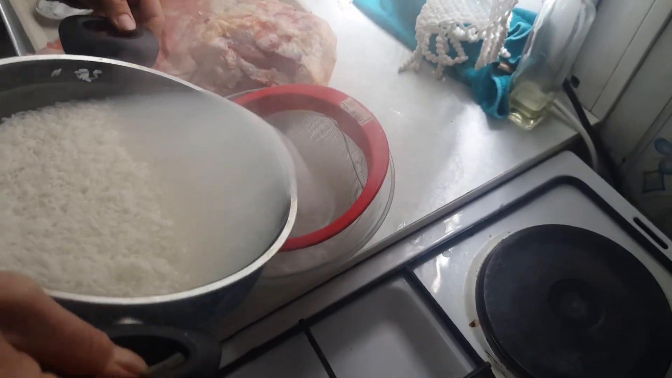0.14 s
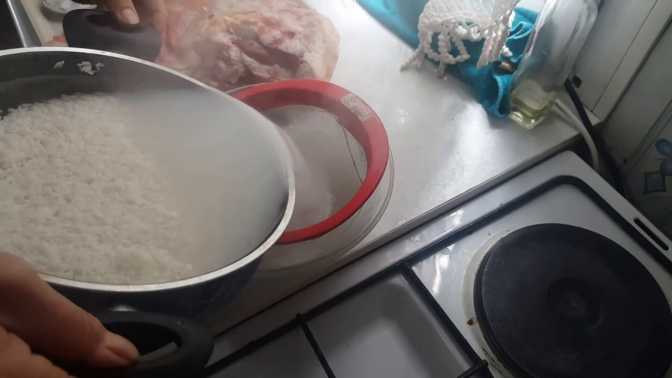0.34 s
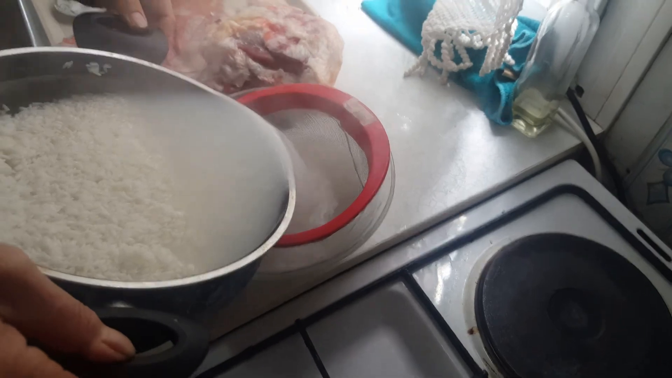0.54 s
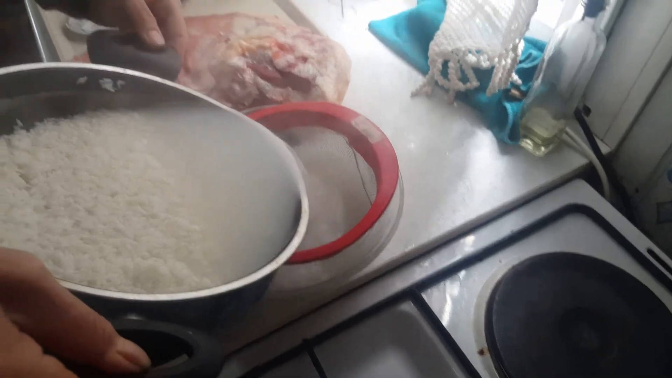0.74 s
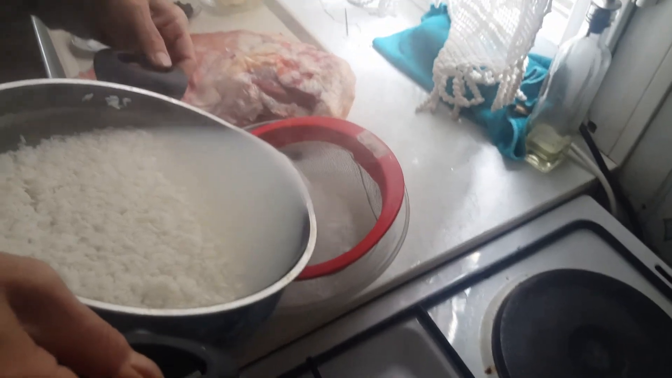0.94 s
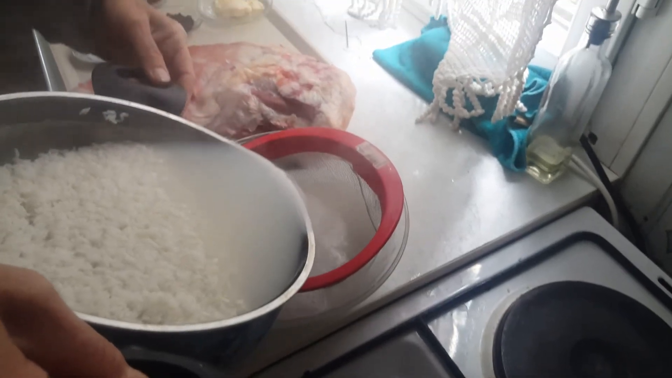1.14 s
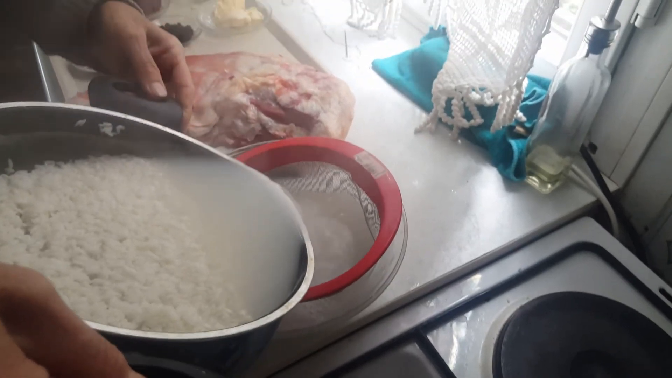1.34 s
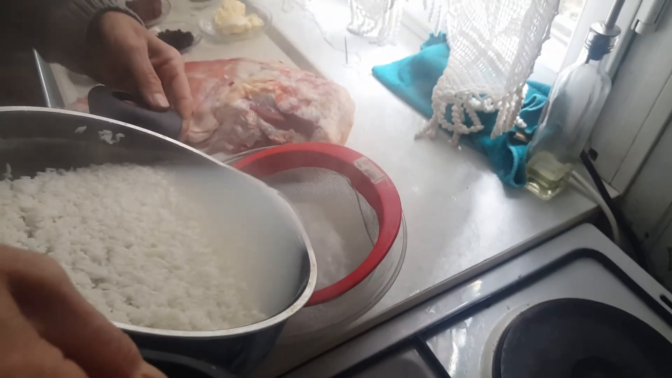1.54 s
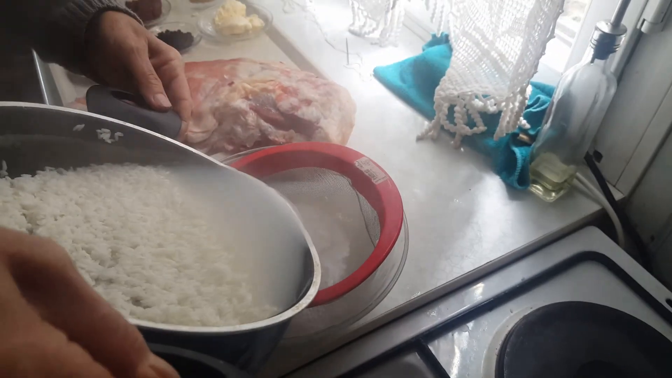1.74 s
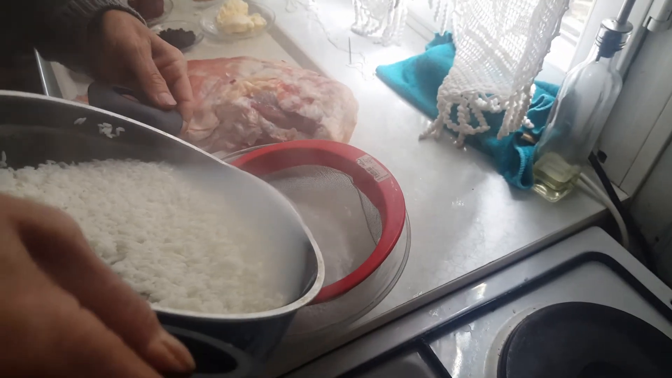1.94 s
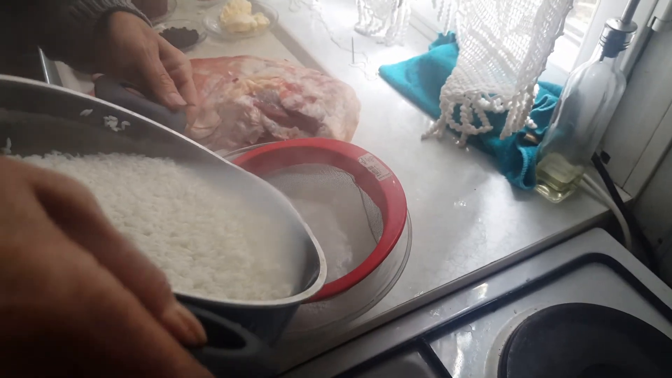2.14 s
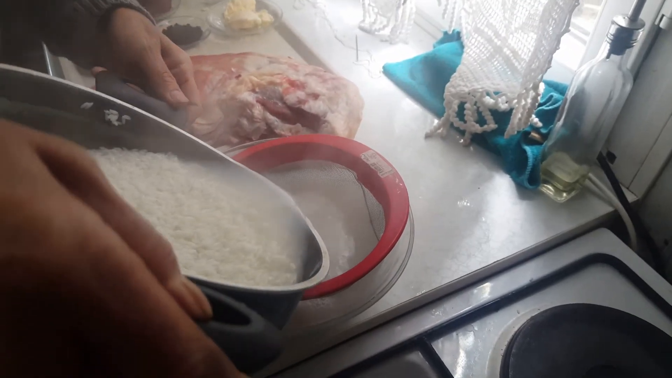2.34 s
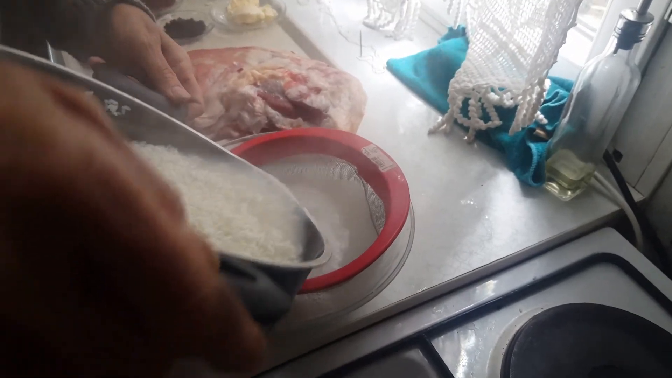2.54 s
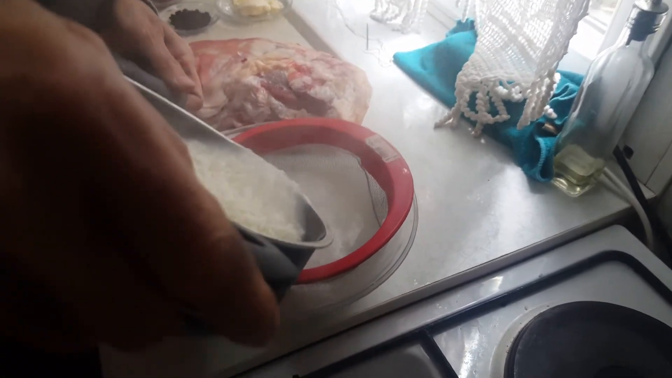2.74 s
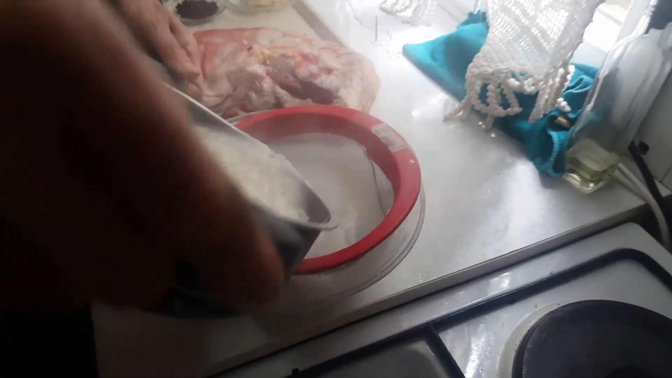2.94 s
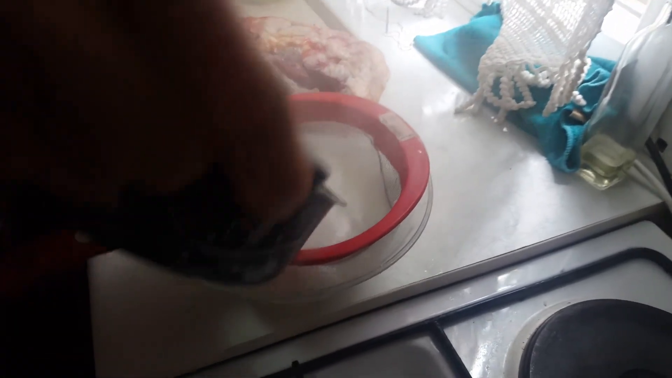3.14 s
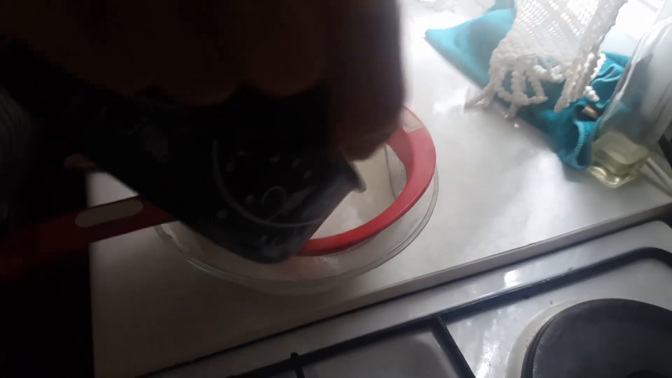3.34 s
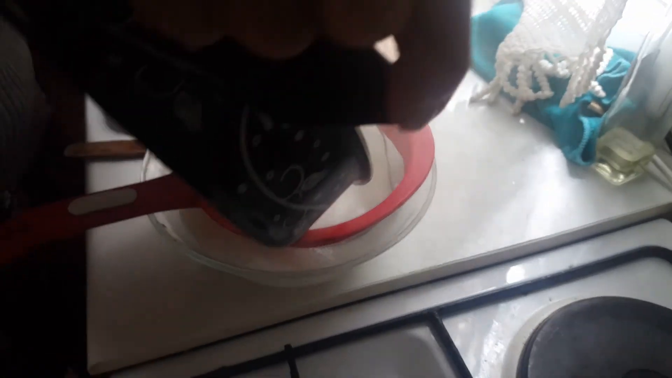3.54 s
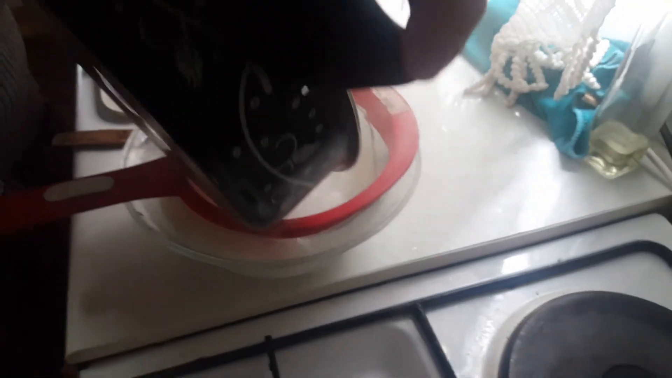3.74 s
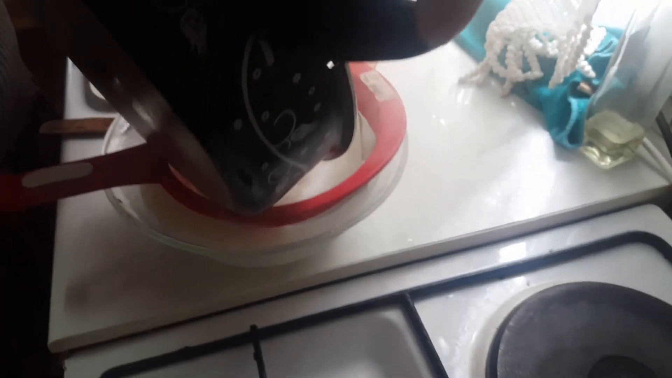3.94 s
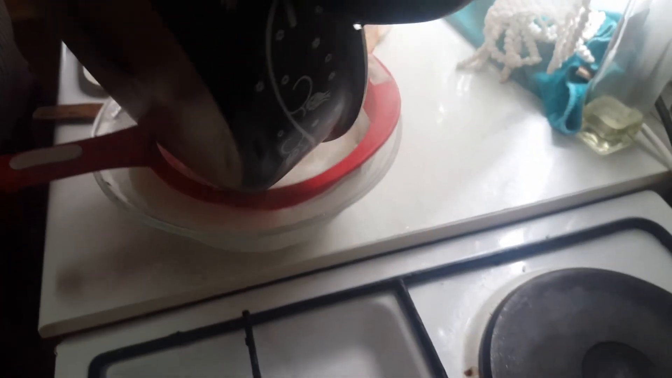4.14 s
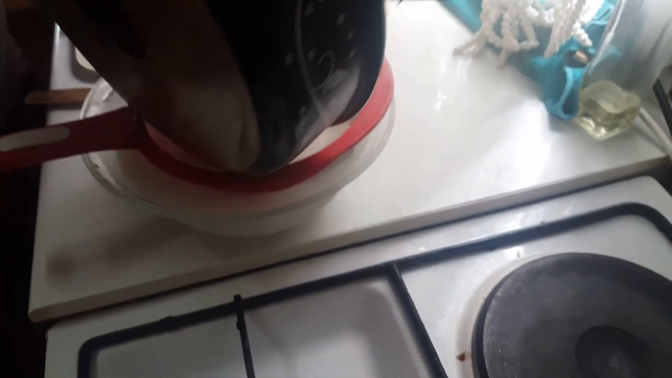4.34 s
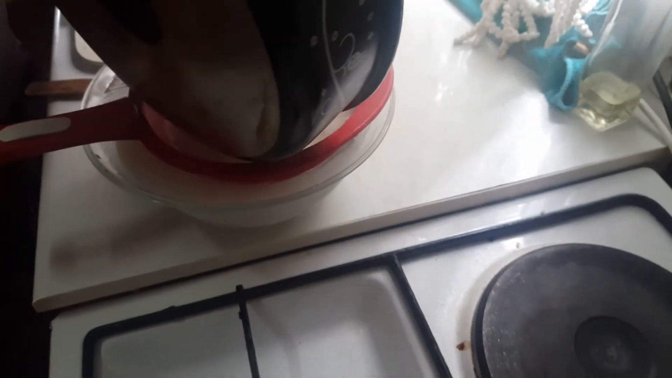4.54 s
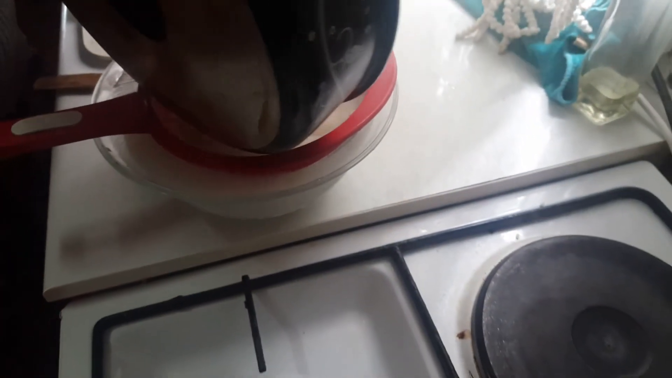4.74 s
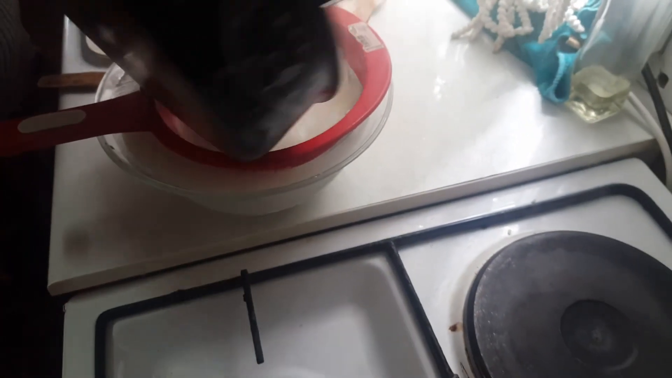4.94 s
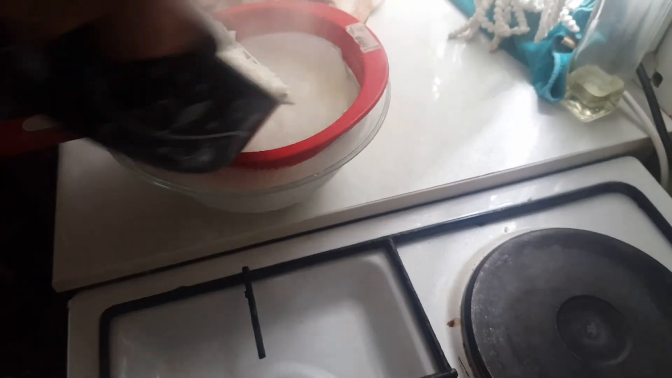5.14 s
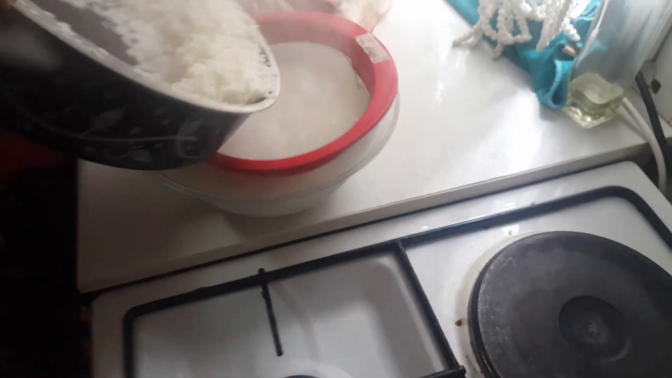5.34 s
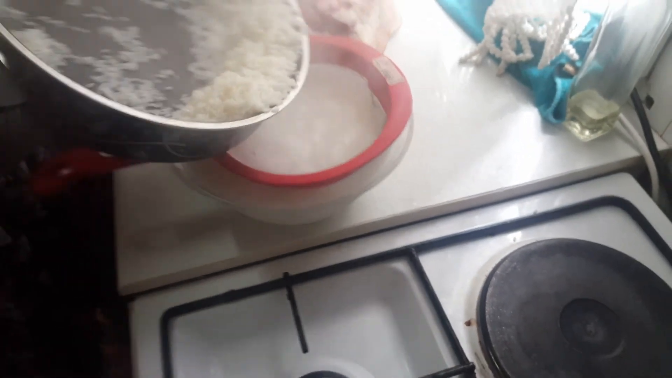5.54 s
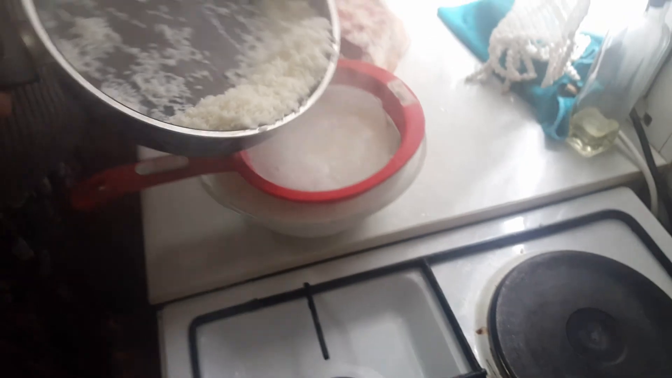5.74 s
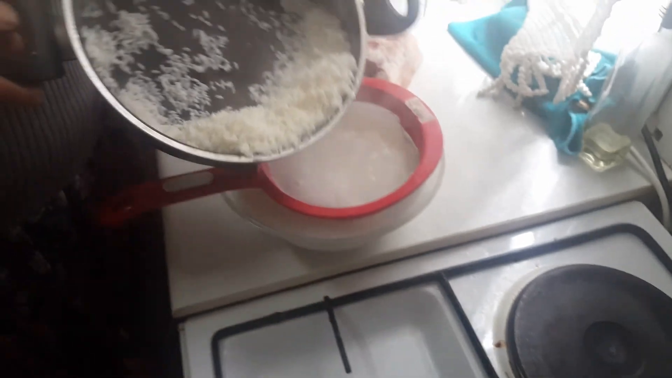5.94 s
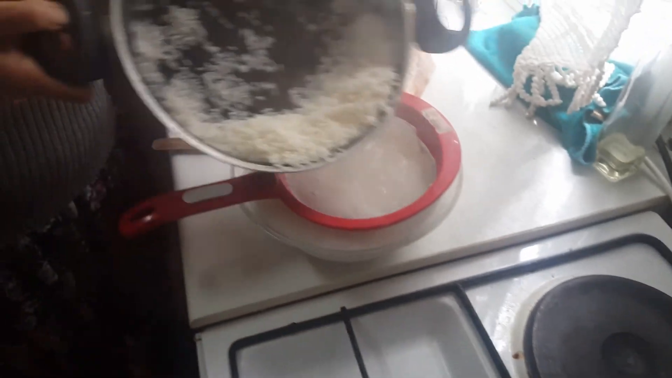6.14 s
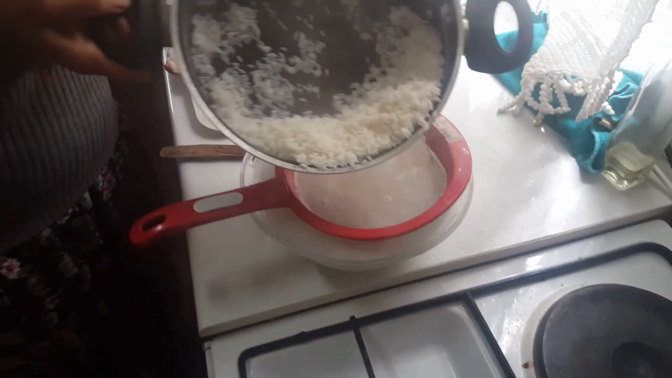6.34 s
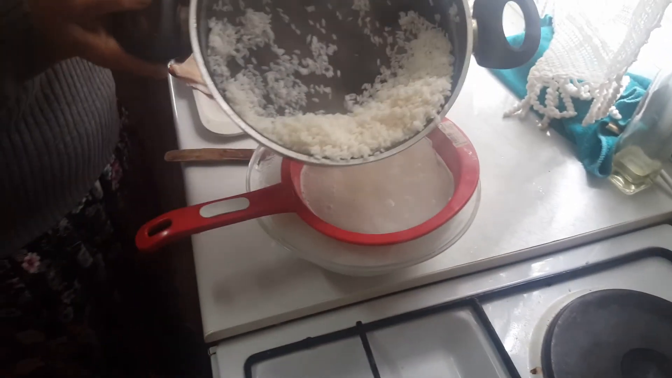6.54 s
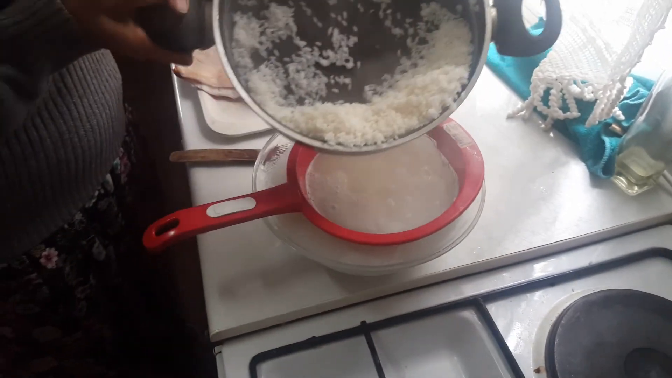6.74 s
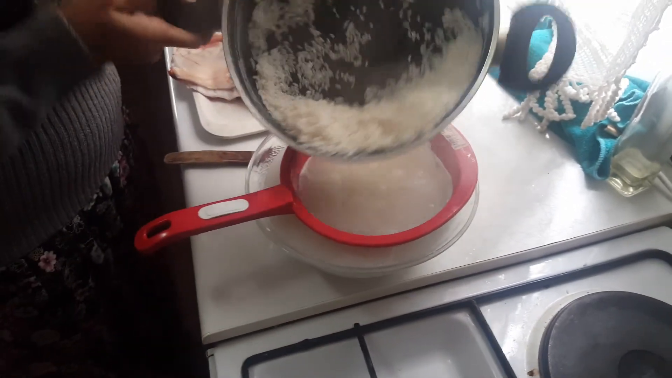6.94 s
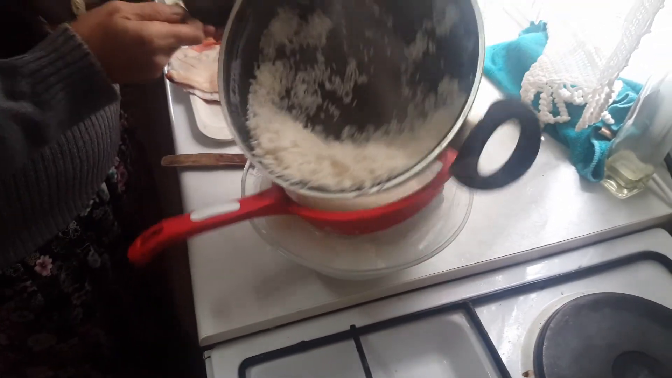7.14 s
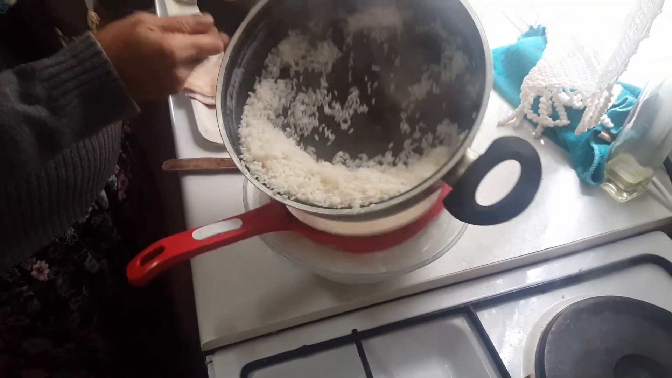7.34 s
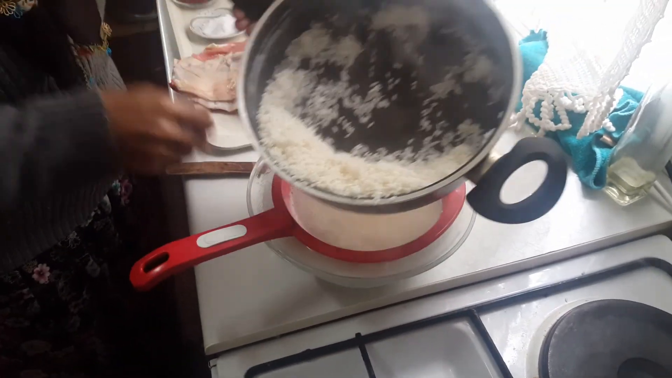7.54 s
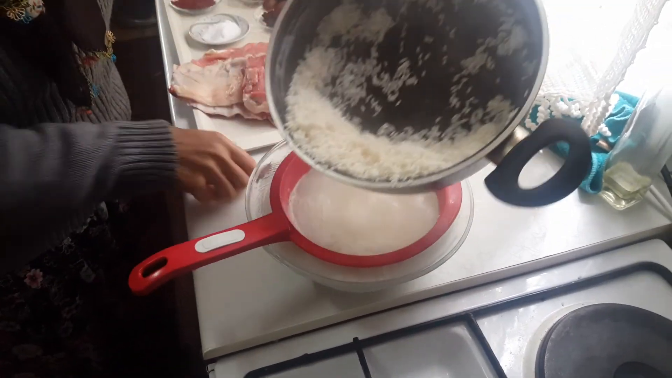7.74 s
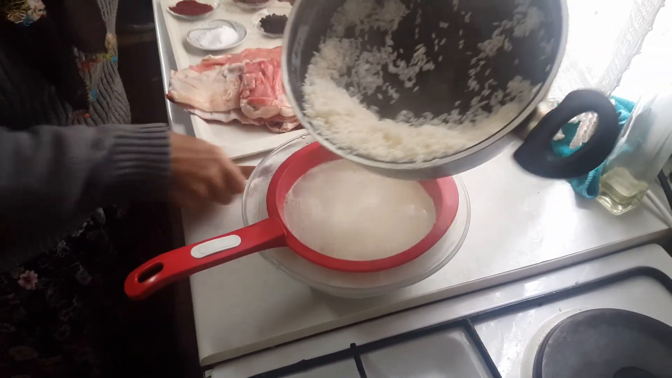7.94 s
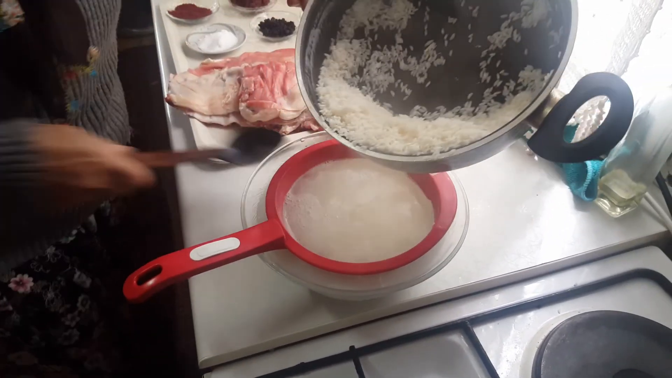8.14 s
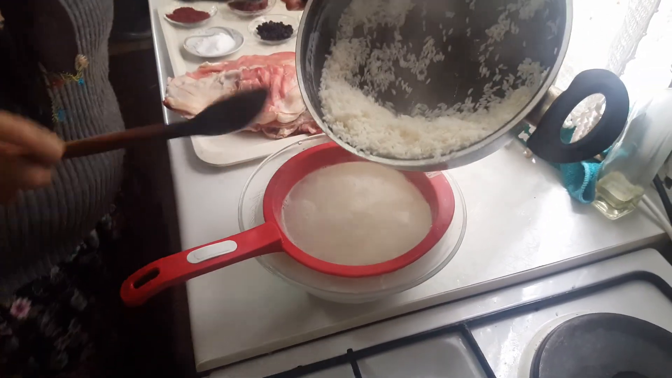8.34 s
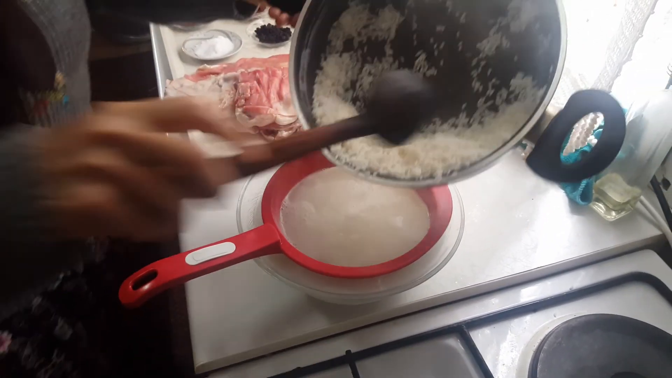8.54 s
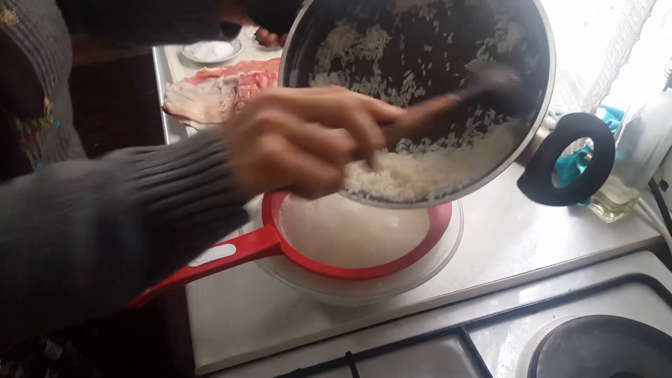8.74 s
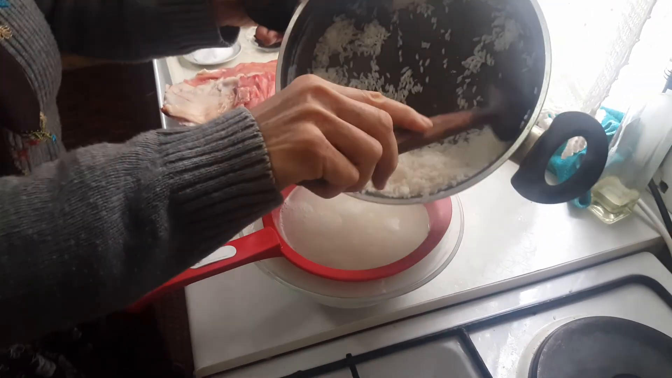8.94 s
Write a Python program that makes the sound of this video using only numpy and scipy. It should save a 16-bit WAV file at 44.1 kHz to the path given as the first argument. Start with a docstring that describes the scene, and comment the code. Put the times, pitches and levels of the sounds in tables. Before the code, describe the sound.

Water trickles and splashes from a pot through a sieve, then the pot bumps the sieve and a wooden spoon knocks once.

```python
"""Rinsing water is poured off rice from a metal pot into a sieve over a bowl, on a kitchen counter.
First a trickle: droplets patter, gouts splat, trapped bubbles ring. After a lull near 2 s the pot tips
and the stream quickens; at 4.8 s wet rice slides out with a hiss. From 5 s the pot bumps sieve and
bowl, the counter thuds and damp grains rustle. A hand nudges the sieve at 7.8 s.
Last, at 8.9 s, a wooden spoon knocks hard on the pot."""
import sys
import numpy as np
from scipy import signal
from scipy.fft import rfft, irfft
from scipy.io import wavfile
from scipy.ndimage import uniform_filter1d

SR = 44100
rng = np.random.default_rng(int(sys.argv[2]) if len(sys.argv) > 2 else 0)


def transcribe(signal):
    """Save signal, clipped to [-1, 1], as a 16-bit WAV file at the path in sys.argv[1]."""
    frames = np.atleast_2d(signal).T
    limited = np.clip(frames, -1, 1)
    pcm = np.round(limited * 32767).astype(np.int16)
    wavfile.write(sys.argv[1], SR, pcm)


N = 400428

# stereo likeness: freq_hz, correlation
COHERENCE = [(110, 0.77), (600, 0.36), (1200, 0.2), (2500, 0.089), (16000, 0.033)]
# stereo balance: freq_hz, left_minus_right_db
BALANCE = [(100, -2), (300, -9), (700, 0.5), (1500, 1), (4000, -6.5), (9000, -0.5), (14000, -5)]
# kitchen decay: freq_hz, t60_s
ROOM_DECAY = [(60, 0.33), (150, 0.67), (400, 0.55), (1400, 0.32), (3000, 0.19), (8000, 0.15), (16000, 0.11)]
# background spectrum: freq_hz, gain_db
AIR_SPECTRUM = [(20, -9), (90, 0), (400, -4), (800, -9), (1800, -14.5), (3300, -12.5), (4300, -22),
                (9000, -24), (10500, -30), (16000, -21)]
# background hums: freq_hz, width_hz, lift_db
AIR_HUMS = [(297.6, 12, 11.5), (2872, 40, 11.3)]
# rice shifting, sleeves brushing, and a brief scrape as the hand nudges the sieve at 7.8 s: start_s, hold_s,
# level_db
RUSTLES = [(5.628, 0.35, -66.5), (6.83, 0.58, -66.5), (7.817, 0.02, -70.5), (8.92, 0.01, -65.5)]
# friction spectrum: freq_hz, gain_db
RUSTLE_SPECTRUM = [(100, 3), (350, 17), (800, 4.5), (1500, 5), (2800, 7), (4500, -3.5), (8500, -2.5),
                   (10500, -7.5), (16000, -3.5)]
# hand on the sieve: start_s, body_db, scrape_db, decay_s
NUDGES = [(7.817, -40.5, -55.5, 0.016), (7.963, -49.5, -75, 0.012)]
# body and scrape bands: edge_hz
NUDGE_EDGES_HZ = [300, 1250, 7500]
# counter top modes: freq_hz, level_db, t60_s
COUNTER_MODES = [(90.1, -1.5, 0.35), (139.6, 0, 0.29), (175.4, -1.5, 0.36), (222.5, -2, 0.23)]
# weight landing on the counter: start_s, level_db, pitch_hz
THUDS = [(5.033, -30.5, 140), (6.008, -21, 175), (6.092, -33, 128), (7.017, -33, 148), (7.144, -32.5, 140),
         (7.238, -33.5, 158), (7.285, -28, 101), (7.487, -36.5, 123), (7.814, -37.5, 140),
         (8.865, -43, 172)]
# hand-held pot modes: freq_hz, level_db, t60_s
POT_MODES = [(438, -4.5, 0.22), (810, -8, 0.074), (1015, -15, 0.26), (1500, -25, 0.085), (2400, 10, 0.0054),
             (2800, -14, 0.11), (3700, -13, 0.11)]
# rim dragging on the sieve: start_s, hold_s, level_db
SCRAPE = (7.084, 0.09, -57.5)
# pot on sieve and bowl: start_s, level_db, hardness_db, note_hz, note_lift_db
BUMPS = [(5.019, -53, 3, 1750, 9.5), (5.034, -43.5, 5, 1700, 10), (5.244, -70, -6.5, 454, 8.5),
         (5.436, -60.5, -0.5, 413, 7), (6.012, -44.5, 3, 2530, 14), (6.089, -56, -9.5, 1730, 13),
         (7.013, -43.5, -2, 880, 10), (7.141, -49, 6, 3470, 7), (7.236, -50, 1.5, 1980, 9),
         (7.283, -55.5, 0.5, 2630, 7), (7.482, -60.5, -3.5, 2110, 7.5), (8.812, -46.5, 1.5, 765, 8)]
# bump bands: edge_hz
BUMP_EDGES_HZ = [300, 800, 1800, 2950, 4050, 16000]
# typical bump: body_db, clack_db, ring_db, edge_db, tick_db
BUMP_SHAPE_DB = [1, 2.5, 2.5, -2.5, -12.5]
# loaded pot under the spoon: freq_hz, level_db, t60_s
SPOON_MODES = [(179, -11, 0.049), (298, -4.5, 0.026), (431, -3.5, 0.049), (563, -9, 0.053), (760, 5, 0.019),
               (919, -1.5, 0.039), (1170, -4.5, 0.018), (1400, 1, 0.017), (1624, 3.5, 0.012),
               (1807, -0.5, 0.02), (2360, -12, 0.028), (3320, -17, 0.02)]
# spoon blow spectrum: freq_hz, gain_db
SPOON_SPECTRUM = [(30, -33), (110, -17), (250, -2.5), (2000, -3.5), (4500, 0), (9000, -5.5), (11000, -29),
                  (16000, -12)]
# hollow of the bowl: freq_hz, width_hz, lift_db
BOWL_PEAKS = [(574, 51, 11), (1410, 320, 11), (2890, 750, 4)]
# drops trapping a bubble: start_s, level_db, pitch_hz
PLINKS = [(0.208, -47, 3650), (0.226, -43, 3700), (1.295, -48, 2630), (1.646, -46, 2730),
          (2.491, -45, 3160), (2.517, -44, 3110), (2.589, -45.5, 3080), (3.472, -40, 1445),
          (3.611, -42.5, 1620), (3.824, -42, 1360), (4.115, -37, 3320), (4.349, -40, 1290),
          (4.657, -37.5, 1700), (4.784, -41.5, 1670)]
# gouts landing in the sieve: start_s, level_db, brightness_db, bubble_hz
SPLATS = [(0.041, -57, -5, 650), (0.178, -64, 5.5, 2460), (0.247, -59, 1.5, 3780),
          (0.309, -61.5, -2.5, 806), (0.342, -70.5, 8.5, 6700), (0.493, -61, -2, 770),
          (0.588, -66.5, -5, 1440), (0.636, -65.5, -5.5, 746), (0.683, -69, 6.5, 8900),
          (0.736, -60.5, -2, 715), (0.832, -55.5, -0.5, 1320), (0.921, -60.5, 2, 1280),
          (0.978, -59, -4, 1680), (0.997, -65.5, -5.5, 1450), (1.051, -59.5, -1, 2767),
          (1.112, -70, -13.5, 726), (1.235, -54.5, -2.5, 740), (1.348, -68.5, 9, 2960),
          (1.452, -68, -1, 600), (1.577, -60, -7.5, 1500), (1.981, -66, -1.5, 610),
          (2.003, -66.5, -1.5, 1300), (2.68, -59, 2, 3580), (2.745, -58.5, 0, 3200), (2.826, -54, -1, 1060),
          (2.88, -51.5, 0, 905), (2.912, -54, -3, 915), (2.955, -53, 0.5, 4020), (2.998, -47.5, -3, 990),
          (3.031, -62, 4, 3830), (3.065, -50, -5, 920), (3.123, -55, 5, 3900), (3.192, -58.5, -10.5, 920),
          (3.257, -54, -2.5, 1200), (3.363, -55.5, 2.5, 1440), (3.411, -52, 2.5, 3110),
          (3.448, -56.5, -5, 1450), (3.507, -58, 3, 980), (3.555, -59, 9, 3780), (3.637, -53, -2.5, 930),
          (3.72, -59.5, 1.5, 1400), (3.847, -52.5, -3.5, 650), (3.917, -49.5, 2, 3330),
          (4.018, -52, -0.5, 1410), (4.074, -51, 2, 1300), (4.139, -59.5, 4.5, 3280),
          (4.22, -54.5, -2, 517), (4.251, -55, -2, 870), (4.287, -52.5, -2, 1120), (4.386, -64, 8.5, 3500),
          (4.452, -62, 10, 3400), (4.487, -53, 2, 1170), (4.654, -54.5, 3.5, 1500), (4.732, -49.5, 6, 3200)]
# gout bands: edge_hz
SPLAT_EDGES_HZ = [300, 1100, 2300, 4500, 16000]
# typical gout: plop_db, splash_db, spatter_db, spray_db
SPLAT_SHAPE_DB = [0.76, -1, 1, -4]
# wet impact spectrum: freq_hz, gain_db
WET_SPECTRUM = [(150, 6), (400, -0.5), (600, 0), (1500, -4.5), (3400, -3), (4600, -8), (9000, -8),
                (10500, -11.5), (16000, -9)]
# trickle note, moving as the sieve fills: time_s, pitch_hz
TRICKLE_NOTE = [(0, 3260), (.6, 2720), (1.6, 2820), (2.3, 3320), (3.4, 2860), (4.6, 3320)]
# water drumming through bowl into counter: time_s, level_db
DRUMMING = [(0, -65), (1.6, -65.5), (2.3, -79), (2.8, -57.5), (3.6, -61), (4.28, -54.5), (4.5, -67),
            (5, -60.5)]
# pour strength: time_s, level_db
FLOW = [(0, -55), (0.28, -59), (0.43, -63.5), (0.6, -59), (1.05, -59.5), (1.85, -66), (2.27, -65.5),
        (2.55, -59), (4.1, -56.5), (4.19, -62.5), (4.27, -54.5), (4.42, -59.5), (4.78, -51), (5.3, -70)]

MIST_RISE_S = 0.003


def amp(db):
    """Decibels to gain."""
    return 10 ** (np.asarray(db) / 20)


def unit(x):
    """Scale to rms 1."""
    return x / np.sqrt(np.mean(x ** 2) + 1e-20)


def seconds(size):
    """Time axis."""
    return np.arange(size) / SR


def lookup(points, hz):
    """Interpolate on a log-frequency axis."""
    freq_hz, value = np.transpose(points)
    return np.interp(np.log(hz + 1), np.log(freq_hz + 1), value)


def envelope(points, fade_db_per_s=19):
    """Gain from a dB curve, fading past its end."""
    time_s, db = np.transpose(points)
    t = seconds(N)
    return amp(np.interp(t, time_s, db) - fade_db_per_s * np.maximum(t - time_s[-1], 0))


def swell(start_s, hold_s, db, rise_db_per_s, fall_db_per_s):
    """Gain that rises until start_s, holds, then falls."""
    t = seconds(N) - start_s
    return amp(db - rise_db_per_s * np.maximum(-t, 0) - fall_db_per_s * np.maximum(t - hold_s, 0))


def add(mix, start_s, sound):
    """Mix in at start_s."""
    part = mix[:, max(round(start_s * SR), 0):][:, :sound.shape[1]]
    part += sound[:, :part.shape[1]]


def band(x, lo_hz, hi_hz, order=3):
    """Causal band-pass."""
    sos = signal.butter(order, [lo_hz, min(hi_hz, SR / 2 - 1)], "band", fs=SR, output="sos")
    return signal.sosfilt(sos, x)


def resonate(x, peaks):
    """Lift narrow bands, which ring."""
    for hz, width_hz, db in peaks:
        x = x + (amp(db) - 1) * signal.lfilter(*signal.iirpeak(hz, hz / width_hz, fs=SR), x)
    return x


def glide(x, hz, width_hz):
    """Narrow resonance following the curve hz."""
    carrier = np.exp(2j * np.pi * np.cumsum(hz) / SR)
    return 2 * (carrier * signal.lfilter(*signal.butter(2, width_hz / 2, fs=SR), x / carrier)).real


def colour(x, spectrum):
    """Zero-phase spectral shaping."""
    return irfft(rfft(x) * amp(lookup(spectrum, np.fft.rfftfreq(N, 1 / SR))), N)


def minimum_phase(x, spectrum):
    """Spectral shaping with energy packed at the start, as in a hard blow."""
    gain = abs(np.fft.fft(x)) * amp(lookup(spectrum, abs(np.fft.fftfreq(len(x), 1 / SR))))
    return np.fft.ifft(np.exp(np.conj(signal.hilbert(np.log(gain + 1e-9))))).real


def stereo_noise(size):
    """Noise alike in the bass, independent in the treble."""
    own, shared = rfft(rng.standard_normal((2, size)))
    alike = np.clip(lookup(COHERENCE, np.fft.rfftfreq(size, 1 / SR)), -1, 1)
    return irfft(np.array([alike * shared + np.sqrt(1 - alike ** 2) * own, shared]), size)


def flutter(size, smooth_samples, depth_db=2.8):
    """Fast random gain."""
    return amp(depth_db * unit(uniform_filter1d(rng.standard_normal(size), smooth_samples)))


def pan(x):
    """Place slightly right."""
    left = colour(x[0], [(hz, db / 2) for hz, db in BALANCE])
    right = colour(x[1], [(hz, -db / 2) for hz, db in BALANCE])
    return np.array([left, right])


def scatter(decay_s, direct, size=8192):
    """Click plus decaying close reflections."""
    x = stereo_noise(size) * np.exp(-seconds(size) / decay_s)
    x /= np.linalg.norm(x[0])
    x[:, 0] += direct
    return x


def ring(modes, detune=0):
    """Decaying modes, detuned by grip and load."""
    t, out = seconds(16384), 0
    for k, (hz, db, t60_s) in enumerate(modes):
        hz *= 1 + detune * rng.standard_normal()
        out += (-1) ** k * amp(db - 60 * t / t60_s) * np.sin(2 * np.pi * hz * t)
    return out


def voicing(edges_hz, shape_db, bright_db, pivot_hz, note_hz, note_db, width_oct):
    """Band levels of a hit: typical shape, brightness tilt, lift at its note."""
    centres_hz = np.sqrt(np.multiply(edges_hz[:-1], edges_hz[1:]))
    tilt_db = bright_db * np.tanh(np.log2(centres_hz / pivot_hz))
    lift_db = note_db * np.exp(-(np.log2(centres_hz / note_hz) / width_oct) ** 2)
    return np.array(shape_db) + tilt_db + lift_db


def set_bands(x, edges_hz, levels_db, head_samples=800):
    """Set each band's rms over the head of a hit."""
    parts = [band(x, lo, hi, order=4) for lo, hi in zip(edges_hz, edges_hz[1:])]
    return sum(amp(db) * part / np.sqrt(np.mean(part[:, :head_samples] ** 2))
               for part, db in zip(parts, levels_db))


def grains(per_s, spread_db):
    """Tiny random impacts on ten spots, a few large."""
    strength = amp(spread_db * np.minimum(rng.exponential(1, N), 4)) * rng.choice([-1, 1], N)
    clicks = strength * (rng.random(N) < per_s / SR)
    spot = rng.integers(0, 10, N)
    return sum(signal.oaconvolve([clicks * (spot == k)], scatter(0.0028, 0.19, 1024), axes=1)[:, :N]
               for k in range(10))


def air(level_db=-65):
    """Steady kitchen background with two hums."""
    return amp(level_db) * unit(resonate(colour(stereo_noise(N), AIR_SPECTRUM), AIR_HUMS))


def room(x):
    """Diffuse tail of a small hard room, decay set per band."""
    hz, t, spectra = signal.stft(stereo_noise(SR * 3 // 4), SR, nperseg=256)
    fade = amp(-60 * t / lookup(ROOM_DECAY, hz)[:, None]) * (1 - np.exp(-t / 0.0016))
    tail = signal.istft(spectra * fade, SR, nperseg=256)[1]
    return signal.fftconvolve(x, tail / np.linalg.norm(tail[0]), axes=1)[:, :N]


def rustle():
    """Fine friction of damp grains and cloth."""
    hiss = colour(grains(per_s=4000, spread_db=4.5), RUSTLE_SPECTRUM)
    moves = sum(swell(*row, rise_db_per_s=124, fall_db_per_s=18) for row in RUSTLES)
    return amp(-0.5) * hiss / band(hiss, 2000, 20400).std() * moves


def nudges():
    """Plastic sieve chatters on the bowl; the hollow answers."""
    out, t = np.zeros((2, N)), seconds(4096)
    for start_s, body_db, scrape_db, decay_s in NUDGES:
        rattle = flutter(len(t), 70) * stereo_noise(len(t)) * np.exp(-t / decay_s)
        hollow = resonate(rattle, [(533, 130, 9.3)])
        add(out, start_s, set_bands(hollow, NUDGE_EDGES_HZ, [body_db, scrape_db]))
    return out


def scrape():
    """Tiny rim slips keep the pot ringing faintly."""
    slips = band(grains(per_s=790, spread_db=5.3), 460, 3200)
    ringing = signal.oaconvolve(slips, ring(POT_MODES)[None], axes=1)[:, :N]
    return unit(unit(slips) + 0.52 * unit(ringing)) * swell(*SCRAPE, rise_db_per_s=54, fall_db_per_s=27)


def counter(pitch_hz, damping=1):
    """Pushed counter: modes near pitch_hz answer most; each contact detunes them."""
    t, x = seconds(SR // 2), 0
    for hz, db, t60_s in COUNTER_MODES:
        decay = amp(db - 14 * np.log2(hz / pitch_hz) ** 2 - 60 * t * damping / t60_s)
        x += decay * np.sin(2 * np.pi * hz * rng.uniform(0.94, 1.05) * t)
    x *= 1 - np.exp(-t / 0.003)
    return np.array([x, x]) / abs(x).max()


def thuds():
    """Counter gives under load, then rings and shudders."""
    out, t = np.zeros((2, N)), seconds(SR // 2)
    attack = 1 - np.exp(-t / 0.0016)
    for start_s, db, hz in THUDS:
        push = np.sin(2 * np.pi * hz * t) * amp(-60 * t / 0.052)
        shudder = unit(band(stereo_noise(len(t)), hz * 0.55, hz * 1.445, order=4)) * amp(-60 * t / 0.58)
        add(out, start_s, amp(db) * (attack * (0.25 * push + 0.15 * shudder) + 0.31 * counter(hz)))
    return out


def bumps():
    """Rim scuffs, then lands with a tick and a hand-damped ring."""
    out, t = np.zeros((2, N)), seconds(4096)
    mid_s = t[-1] / 2
    for start_s, db, hard_db, note_hz, note_db in BUMPS:
        bands_db = db + voicing(BUMP_EDGES_HZ, BUMP_SHAPE_DB, hard_db, pivot_hz=1300,
                                note_hz=note_hz, note_db=note_db, width_oct=0.42)
        # dull bumps stay in contact longer and choke the ring
        contact_s = np.interp(hard_db, [-7, 6], [0.009, 0.0035])
        t60_scale = np.interp(hard_db, [-2, 2], [0.25, 1])
        modes = [(hz, mode_db, t60_s * t60_scale) for hz, mode_db, t60_s in POT_MODES]
        body = 0.0082 * ring(modes, detune=0.01)
        body[0] += 1
        hit = signal.fftconvolve(scatter(contact_s, direct=0.48), body[None], axes=1)
        hit = signal.lfilter(*signal.butter(2, 5500, fs=SR), hit)  # rim's give dulls the top
        hit = resonate(hit, [(note_hz, 150 + note_hz * 0.15, 8), (430, 110, 9)])  # spot, pot's hollow
        add(out, start_s, set_bands(hit, BUMP_EDGES_HZ, bands_db, head_samples=600))
        scuff = stereo_noise(len(t)) * np.exp(-abs(t - mid_s) / 0.0033)
        add(out, start_s - mid_s, amp(-24 - hard_db) * set_bands(scuff, BUMP_EDGES_HZ, bands_db, len(t)))
    return amp(-0.5) * pan(out)


def spoon(start_s=8.8645, level_db=-20.5):
    """Wood on the loaded pot: dull, hard knock, faint click."""
    body = ring(SPOON_MODES)
    body[0] += 0.9
    blow = minimum_phase(body, SPOON_SPECTRUM)
    hit = signal.fftconvolve(scatter(0.0084, direct=1.43), blow[None], axes=1)
    hit = hit + 0.085 * hit[::-1]  # close by: channels nearly alike
    out = np.zeros((2, N))
    add(out, start_s, amp(level_db) * hit / hit[:, :SR // 50].std())
    return out


def rice_slide(peak_s=4.78, level_db=-48):
    """Wet rice hisses into the sieve."""
    hiss = unit(band(colour(grains(per_s=3500, spread_db=4.2), WET_SPECTRUM), 4800, SR / 2))
    return hiss * swell(peak_s, 0, level_db, rise_db_per_s=99, fall_db_per_s=39.5)


def thumps(lift_db=7):
    """Gouts push the bowl onto the counter; heavy, dull ones most."""
    out = np.zeros((2, N))
    for start_s, db, bright_db, _ in SPLATS:
        weight_db = 0.5 * (db - 0.5 * bright_db + 47)
        drum_db = np.interp(start_s, *np.transpose(DRUMMING))
        add(out, start_s, amp(drum_db + lift_db + weight_db) * counter(pitch_hz=137, damping=1.4))
    return out


def plinks(decay_s=0.0048, rise_per_s=0.79):
    """A drop splashes and traps a bubble, which rings, rising slightly."""
    out, t = np.zeros((2, N)), seconds(2048)
    for start_s, db, hz in PLINKS:
        note = np.sin(2 * np.pi * hz * (t + rise_per_s * t ** 2 / 2)) * np.exp(-t / decay_s)
        splash = unit(band(stereo_noise(len(t)), hz * 0.57, hz * 1.07, order=2))
        add(out, start_s, amp(db - 8) * splash * np.exp(-t / (2 * decay_s)))
        reflections = 0.45 * scatter(0.0035, direct=2.3, size=2048)
        add(out, start_s, amp(db) * signal.fftconvolve(reflections, note[None], axes=1))
    return out


def mist(spread_s, count=110, lo_hz=4500, hi_hz=15000):
    """A gout's finest droplets land as separate dry ticks."""
    out, t = np.zeros((2, 4096)), seconds(256)
    for early, late, pitch, softness, side in rng.random((count, 5)):
        hz = lo_hz * (hi_hz / lo_hz) ** pitch
        tick = np.exp(-t * hz / 2.7) * np.sin(2 * np.pi * (hz * t + np.array([[side - 0.5], [0]])))
        delay_s = -MIST_RISE_S * np.log(1 - early) - spread_s * np.log(1 - late)
        add(out, delay_s, amp(-14 * softness) * tick)
    return out


def splats():
    """Each gout plops in the bowl's hollow and breaks into droplets."""
    out, t = np.zeros((2, N)), seconds(4096)
    for start_s, db, bright_db, hz in SPLATS:
        plop_db, *mids_db, spray_db = db + voicing(
            SPLAT_EDGES_HZ, SPLAT_SHAPE_DB, bright_db, pivot_hz=2020,
            note_hz=hz, note_db=4.5, width_oct=0.53)
        # bright gouts: more droplets, landing for longer
        spread_s = 0.0088 * np.exp(0.04 * bright_db + 0.22 * rng.standard_normal())
        breakup = 1.4 * np.exp(-t / 0.00065) + np.exp(-t / spread_s)  # slap, then droplets
        bubble = (hz, 95, np.clip(13 - 0.12 * bright_db, 5, 17))  # swallowed air rings
        peaks = [*BOWL_PEAKS, bubble]
        droplets = resonate(flutter(len(t), 50) * stereo_noise(len(t)) * breakup, peaks)
        plop = resonate(scatter(0.0093, direct=0.56, size=4096), peaks + [(470, 92, 5.2)])
        spray = set_bands(mist(0.6 * spread_s), SPLAT_EDGES_HZ[-2:], [spray_db])
        add(out, start_s - MIST_RISE_S, amp(-1) * spray)
        add(out, start_s, set_bands(droplets, SPLAT_EDGES_HZ[1:-1], mids_db))
        add(out, start_s, amp(1.56) * set_bands(plop, SPLAT_EDGES_HZ[:2], [plop_db]))
    return colour(out, [(4000, -1), (8800, 8), (10500, 3.5), (16000, 8)])


def bubbles(per_s, lo_hz, hi_hz, decay_cycles):
    """Small air pockets ring briefly, each at its own pitch."""
    out, t = np.zeros((2, N)), seconds(2048)
    for when, pitch, softness, side in rng.random((int(per_s * N / SR), 4)):
        hz = lo_hz * (hi_hz / lo_hz) ** pitch
        phase_rad = np.array([[(side - 0.5) * hz / 900], [0]])
        note = np.exp(-hz * t / decay_cycles) * np.sin(2 * np.pi * hz * t + phase_rad)
        add(out, when * N / SR, amp(-20 * softness) * note)
    return unit(out)


def stream(lumps_db=4.2, gurgle_db=-5.5, patter_db=-0.87, spray_db=-9.5, drum_db=-5.5):
    """Lumpy flow of droplets and bubbles in the mesh, coloured by the bowl, drumming on the counter."""
    lumps = amp(lumps_db * np.tanh(unit(band(rng.standard_normal(N), 13.8, 49, order=2))))
    drops = unit(resonate(colour(grains(per_s=1300, spread_db=5.3), WET_SPECTRUM), BOWL_PEAKS))
    water = lumps * (drops + amp(-3.5) * bubbles(520, 564, 3960, decay_cycles=6))
    gurgle = amp(gurgle_db) * unit(band(water, 257, 2040))
    note = glide(water, np.interp(seconds(N), *np.transpose(TRICKLE_NOTE)), width_hz=230)
    patter = amp(patter_db) * unit(unit(band(water, 1820, 4300)) + 0.42 * unit(note))
    fine_drops = unit(band(colour(grains(per_s=1800, spread_db=2.3), WET_SPECTRUM), 4200, 15400))
    fizz = amp(-6.5) * bubbles(300, 4490, 9500, decay_cycles=14)
    spray = amp(spray_db) * unit(lumps * (fine_drops + fizz))
    low_drops = resonate(band(grains(per_s=260, spread_db=3.8), 100, 247), [(140, 30, 11.4)])
    drum = amp(drum_db) * unit(lumps * low_drops)
    return (gurgle + patter + spray) * envelope(FLOW) + drum * envelope(DRUMMING)


def scene():
    """Close pour, pot and spoon with room sends, over counter and background."""
    pour = pan(stream() + rice_slide() + splats() + plinks() + rustle())
    pot = bumps() + nudges() + scrape()
    knock = spoon()
    boom = resonate(knock, [(405, 99, 7.9), (1300, 230, 9.2)])  # pot's hollow
    reverb = room(amp(-8.5) * pour + amp(-13.5) * pot + amp(-18) * boom)
    return pour + pot + knock + thuds() + thumps() + pan(air()) + reverb


def record(dry, lag_samples=4, cutoff_hz=15950):
    """Delay the right channel, then low-pass."""
    stereo = np.array([dry[0], np.pad(dry[1], (lag_samples, 0))[:N]])
    lowpass = signal.firwin(511, cutoff_hz, window=("kaiser", 9), fs=SR)
    return signal.oaconvolve(stereo, lowpass[None], "same")


dry = scene()
out = record(dry)
transcribe(out)
```